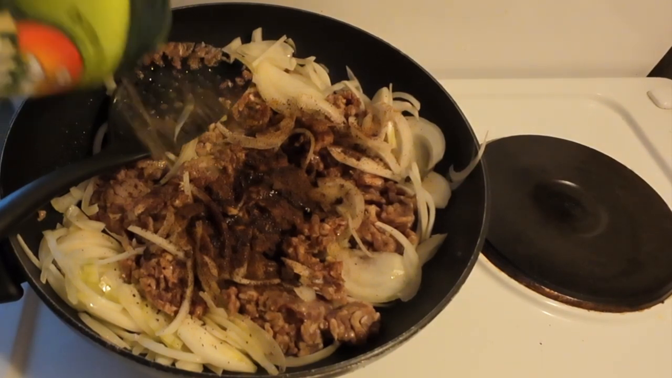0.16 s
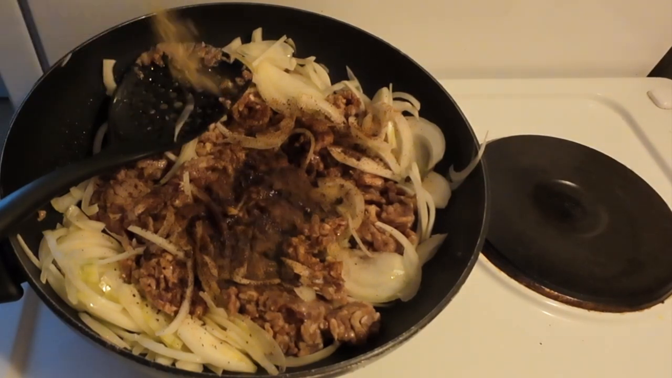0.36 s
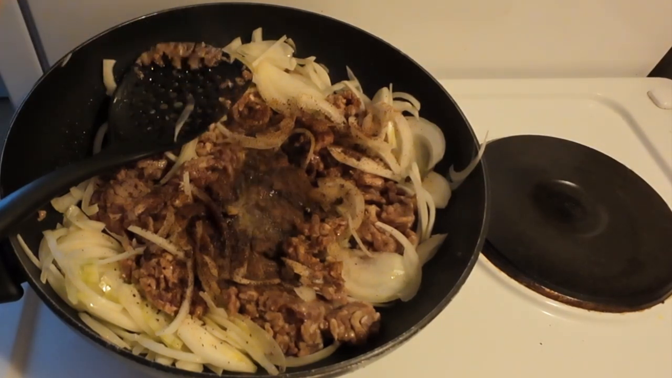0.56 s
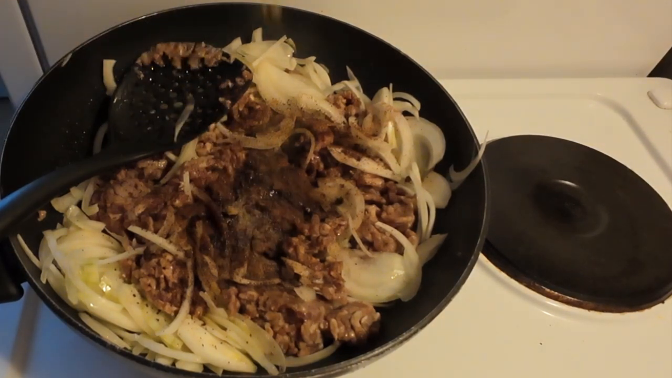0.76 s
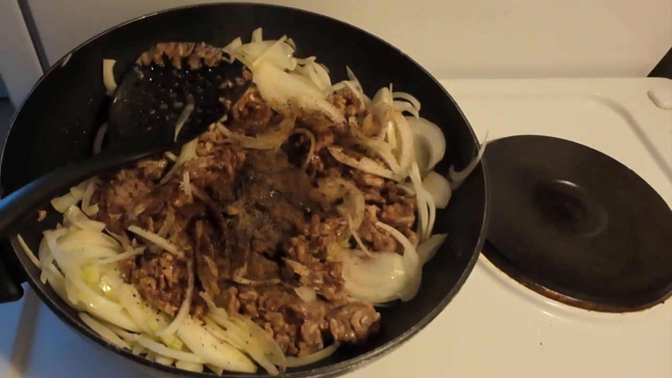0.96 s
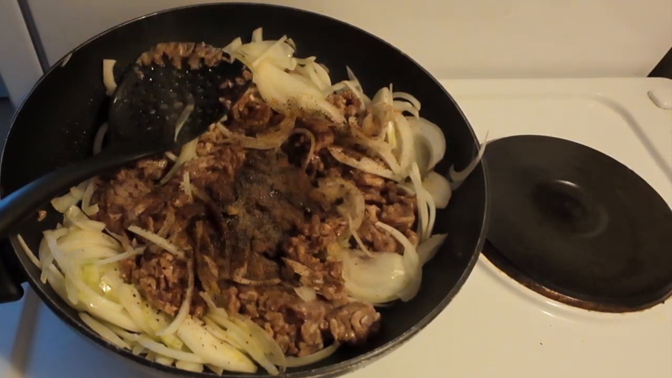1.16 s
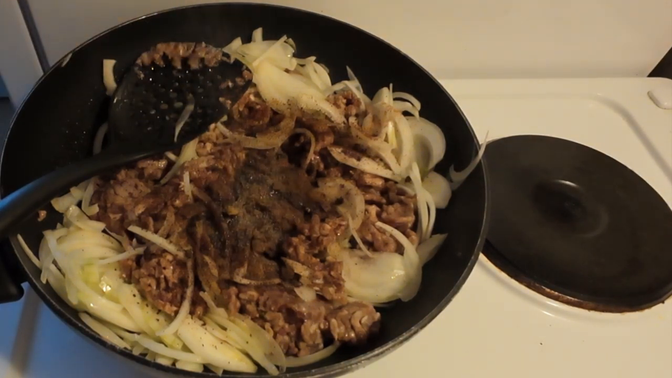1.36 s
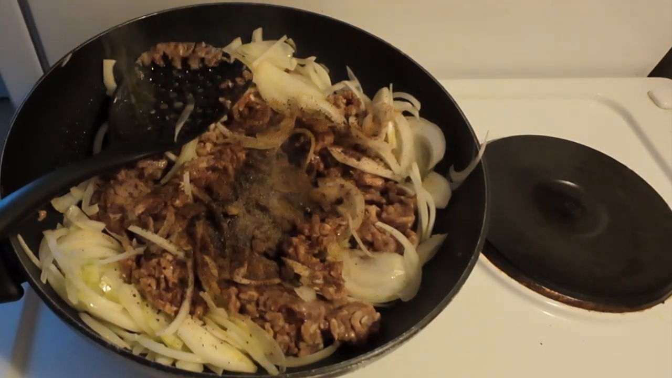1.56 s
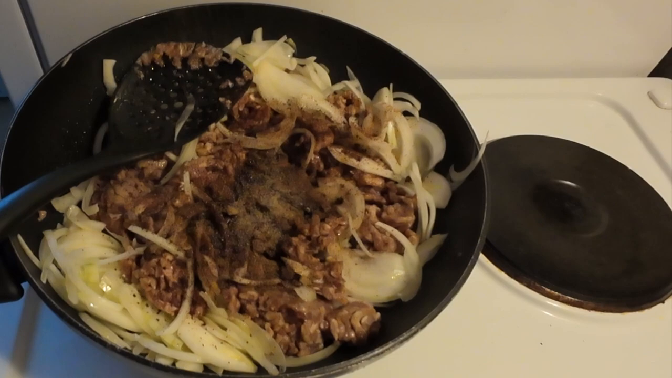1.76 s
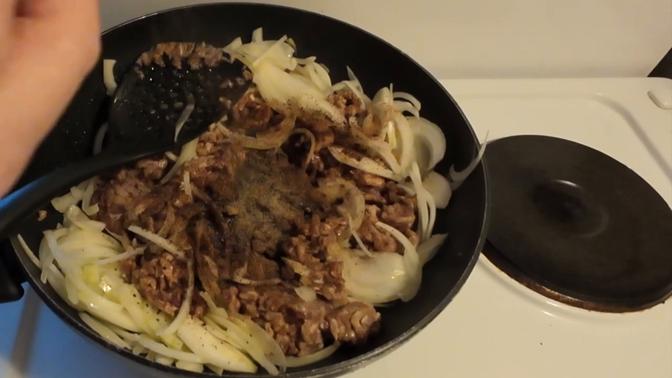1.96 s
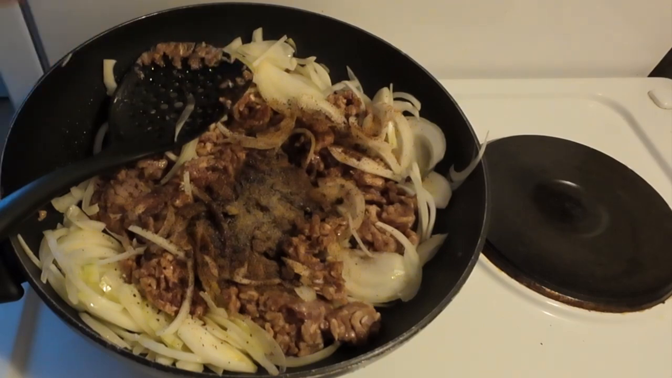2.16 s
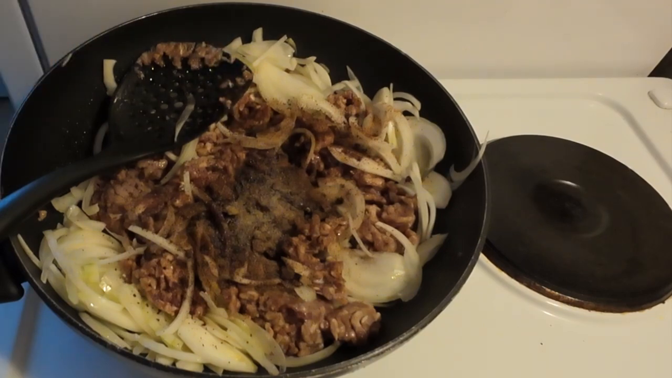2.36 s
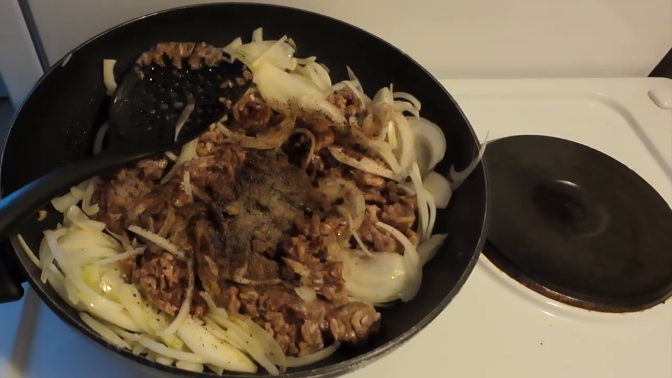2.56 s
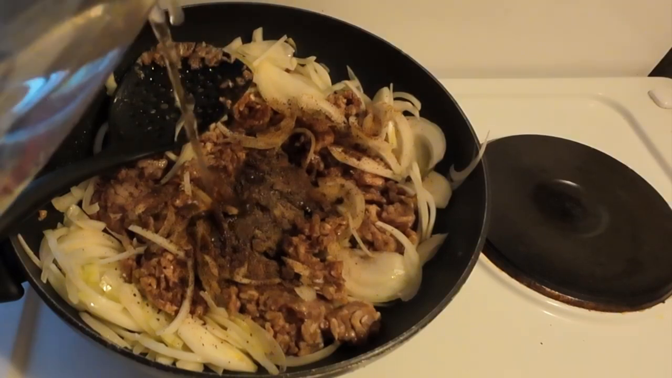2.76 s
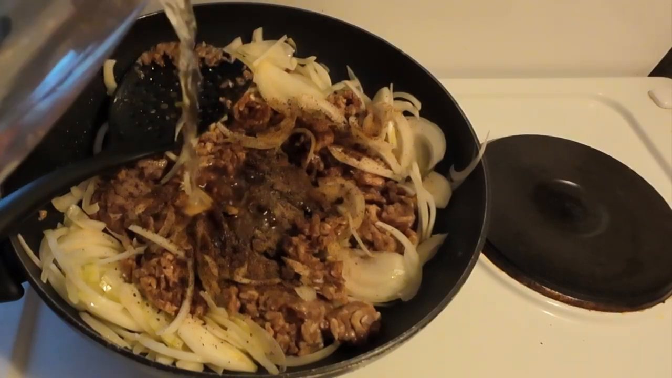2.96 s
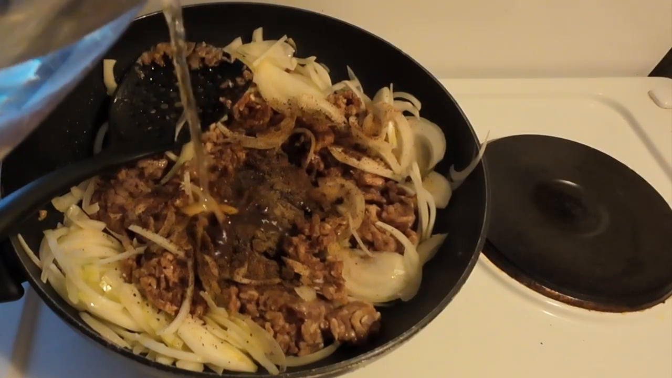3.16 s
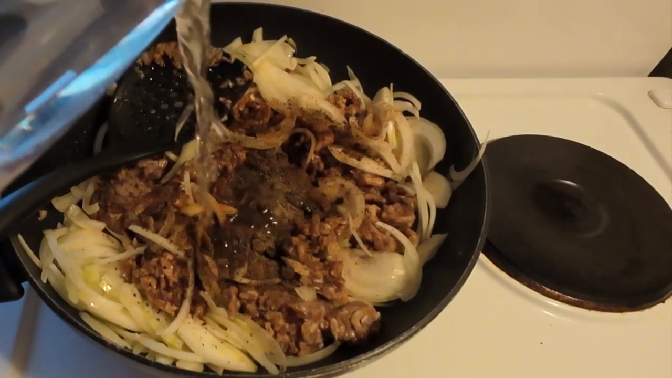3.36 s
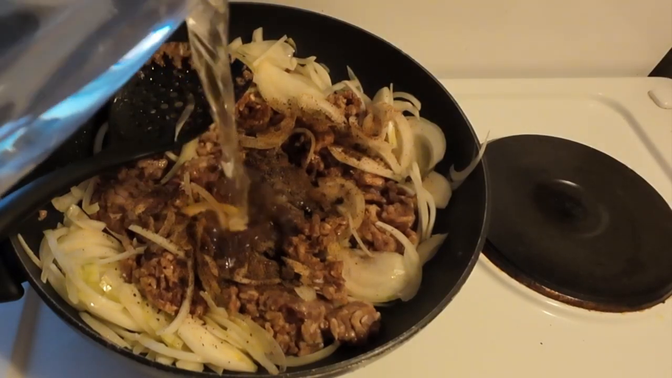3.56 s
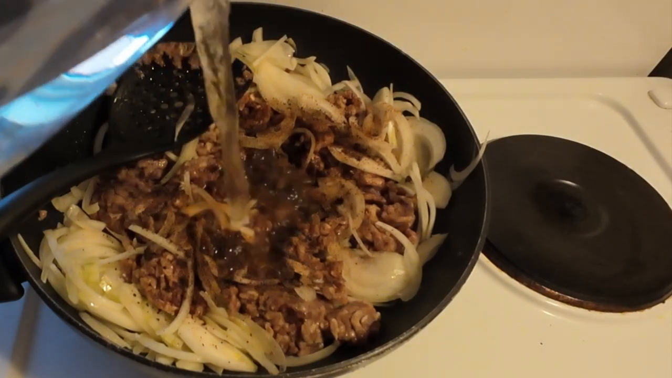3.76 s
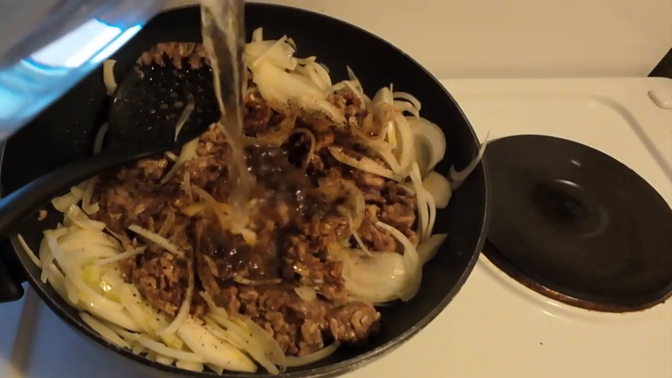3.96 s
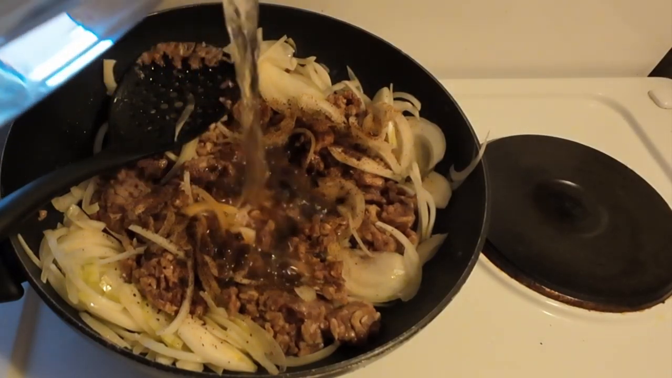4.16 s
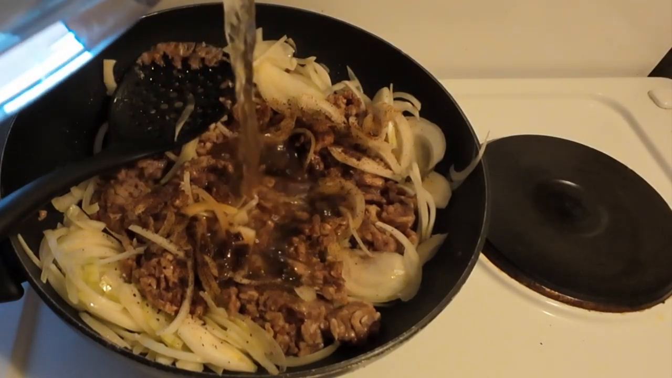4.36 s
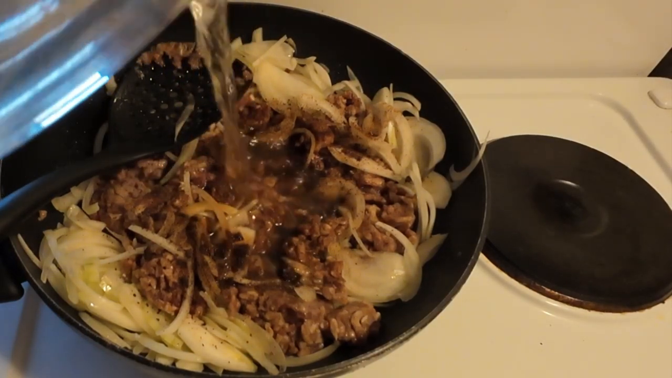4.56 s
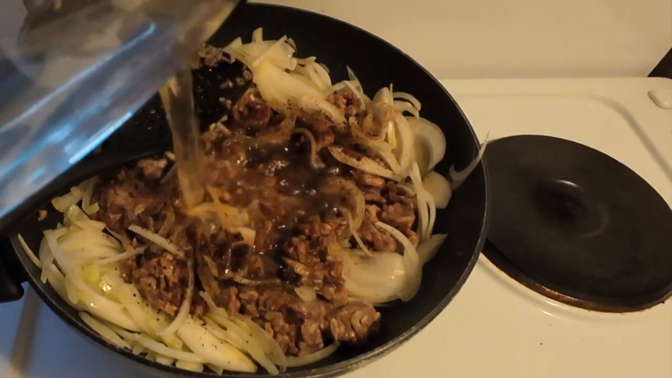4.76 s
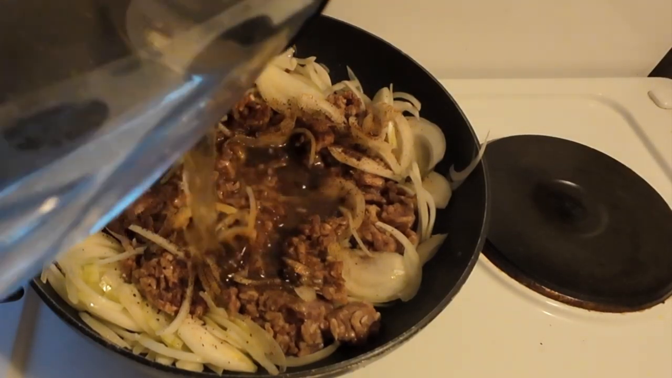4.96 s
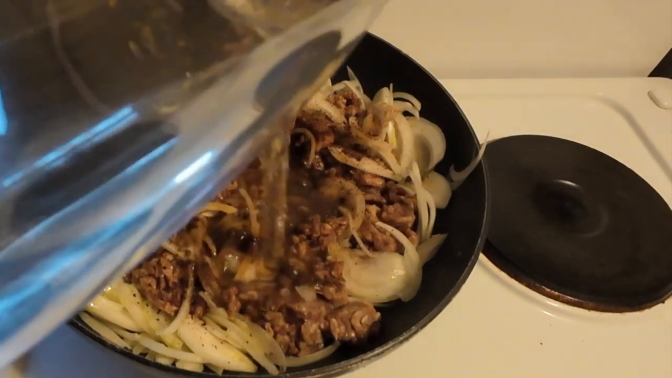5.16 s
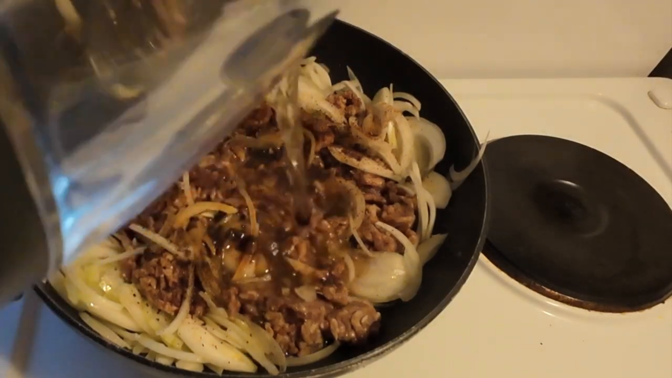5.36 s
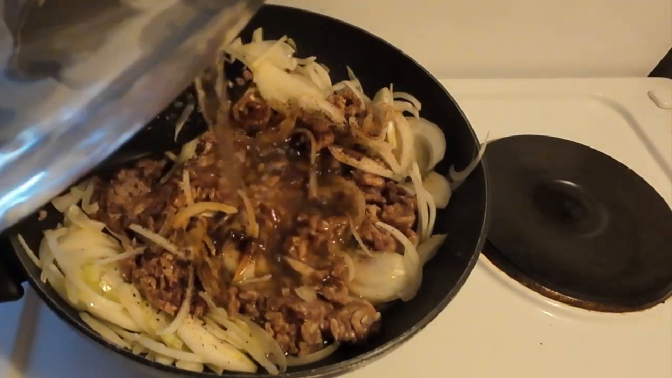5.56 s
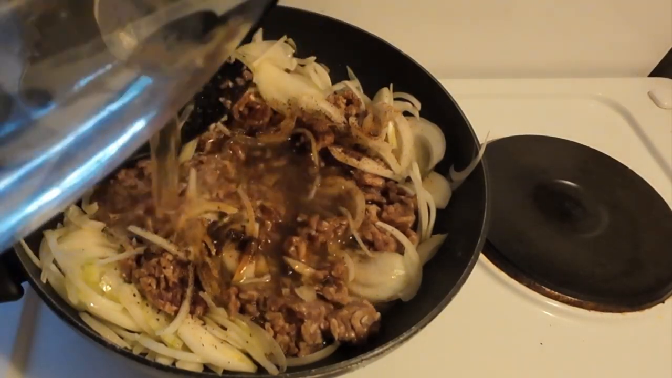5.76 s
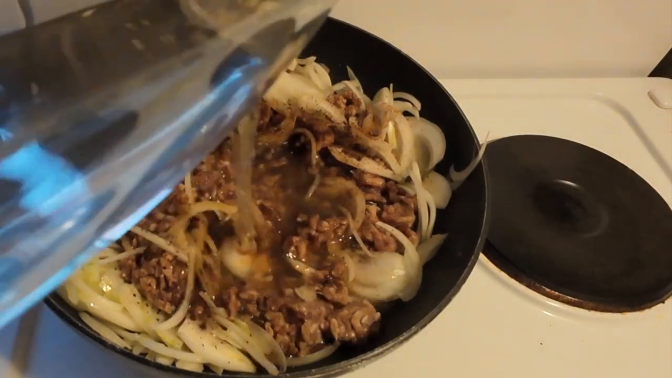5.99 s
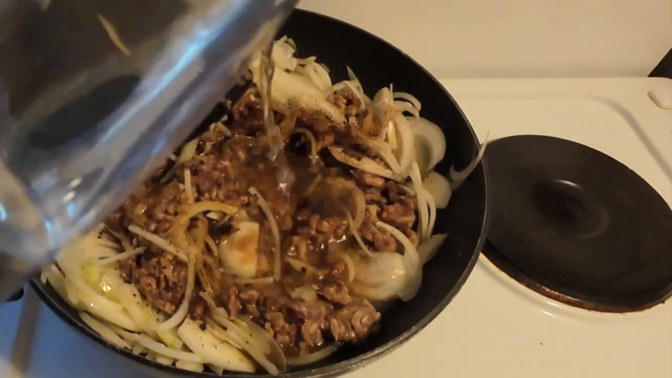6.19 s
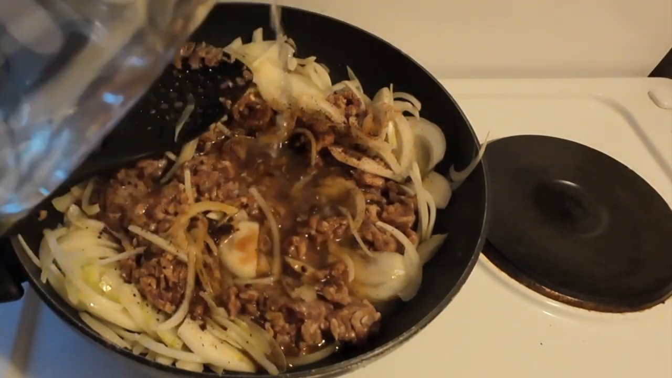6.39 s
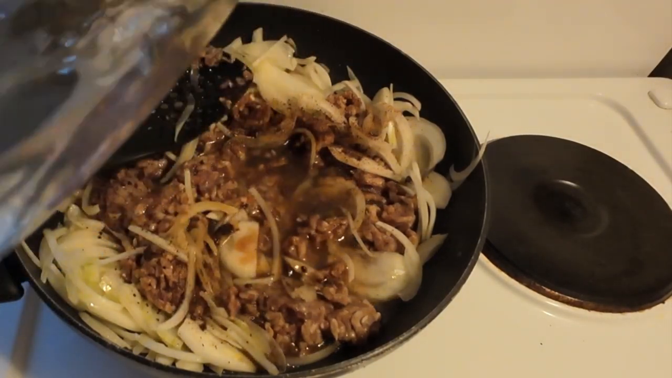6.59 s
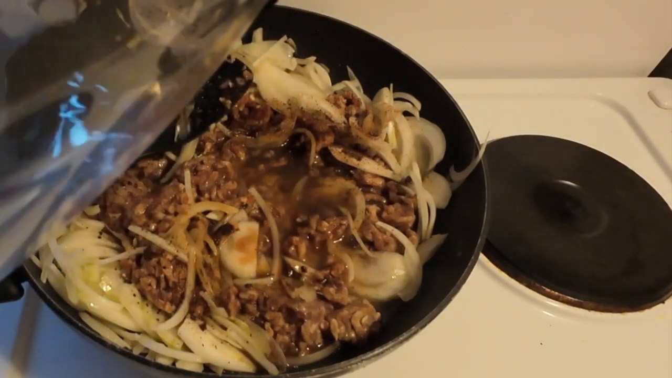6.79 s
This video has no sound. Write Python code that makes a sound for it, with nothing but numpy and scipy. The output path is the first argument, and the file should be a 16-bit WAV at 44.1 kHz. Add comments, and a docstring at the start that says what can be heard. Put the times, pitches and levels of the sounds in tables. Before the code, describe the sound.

A gentle steady pan sizzle and a few crackles give way to a lively splashing pour of water that breaks into drops and fades.

```python
"""Water poured into a sizzling pan

Minced meat and onions sizzle softly: a hiss of many random bursts, with short crackles where fat spits.
Water is poured from a jug: drops ring as short bright plips over a fizz of tiny clicks, until all fades.
Behind it lie dull rubbing and a thin whistling hiss, both made of noise ringing in resonances.
A close pair of microphone ports adds low filtered noise as rumble, the left one shaken by the pouring."""
import sys
import numpy as np
from scipy import signal
from scipy.fft import rfft, irfft, next_fast_len
from scipy.io import wavfile

SR = 44100
rng = np.random.default_rng(int(sys.argv[2]) if len(sys.argv) > 2 else 0)


def dump_mix(stems):
    """Bounce the given channels to the path in sys.argv[1] as a 16-bit WAV at rate SR."""
    frames = np.atleast_2d(stems).T  # one column per channel
    limited = np.clip(frames, -1, 1)  # hard clip at full scale
    pcm = np.round(limited * 32767).astype(np.int16)
    wavfile.write(sys.argv[1], SR, pcm)


N = 301203   # length in samples


def from_db(db):
    """Decibels to gain."""
    return 10 ** (np.asarray(db) / 20)


def rms_one(x):
    """Scale to an average strength (rms) of 1."""
    return x / np.sqrt(np.mean(x ** 2) + 1e-20)


def in_time(rows):
    """Turn (seconds, dB) rows into a curve in dB, sample by sample; -120 dB before the first row."""
    s, db = np.transpose(rows)
    return np.interp(np.arange(N) / SR, s, db, left=-120)


def at_hz(points, hz):
    """Read a (Hz, dB) table between its rows, on a log-frequency axis."""
    table_hz, db = np.transpose(points)
    return np.interp(np.log(hz), np.log(table_hz), db)


def colour(x, points):
    """Filter a sound by a (Hz, dB) table."""
    size = next_fast_len(N)
    hz = np.maximum(np.arange(size // 2 + 1) * SR / size, 1)
    return irfft(rfft(x, size) * from_db(at_hz(points, hz)), size)[:N]


def filtered(x, order, hz, kind):
    """Filter that keeps the low part, the high part or a band."""
    return signal.sosfilt(signal.butter(order, hz, kind, fs=SR, output="sos"), x)


def drift(rate):
    """Slow random wandering, about rate changes a second; spread 1."""
    r = np.exp(-80 * np.pi * rate / SR)   # computed at every 40th sample
    noise = rng.standard_normal(N // 40 + 2002)
    slow = signal.lfilter([1], [1, -2 * r, r * r], noise)[2000:]
    return np.interp(np.arange(N) / 40, np.arange(len(slow)), rms_one(slow))


def ring(clicks, hz, cycles):
    """A click sets a sine ringing that dies by 60 dB in so many cycles."""
    r, w = from_db(-60 * hz / (cycles * SR)), 2 * np.pi * hz / SR
    return signal.lfilter([0, np.sin(w)], [1, -2 * r * np.cos(w), r * r], clicks + 1e-18)


def grains(per_s, spread_db):
    """Random clicks: a positive spread makes a few much larger, a negative one a few much smaller."""
    sizes = from_db(spread_db * np.minimum(rng.exponential(1, N), 4.4))
    signs = rng.choice([-1, 1], N)
    return sizes * signs * (rng.random(N) < per_s / SR)


def swells(rows, rise, fall):
    """Bursts that rise over a share of their length, hold to its end, then die away."""
    t, shape = np.arange(N) / SR, np.zeros(N)
    for s, peak_db, length in rows:
        u = np.clip((t - s) / length, 0, 12)   # time in lengths of the burst
        dying = np.exp(-np.maximum(u - 1, 0) * fall)
        shape += from_db(peak_db) * np.minimum(u / rise, 1) * dying * (u < 12)
    return shape


def hollow(noise, modes):
    """Noise passes twice through each resonance, so the gaps between them stay dark."""
    out = 0
    for hz, wide, db in modes:
        cycles = 3.73 * hz / wide
        out = out + from_db(db) * rms_one(ring(ring(noise, hz, cycles), hz, cycles))
    return rms_one(out)


def wavering(noise, modes, swing_db, rate):
    """Resonances whose levels wander each on its own."""
    return rms_one(sum(from_db(mode[2] + swing_db * drift(rate)) * hollow(noise, [mode])
                       for mode in modes))


def scattered(x, t60):
    """Four short bursts of echoes, each dying by 60 dB in t60 seconds, in ever changing shares."""
    t = np.arange(round(np.clip(t60, .005, .25) * SR)) / SR
    tails = rng.standard_normal((4, SR // 4))[:, :len(t)] * from_db(-60 * t / t60)
    return sum(signal.fftconvolve(x * drift(60), tail / np.sqrt(4 * np.sum(tail ** 2)))[:N]
               for tail in tails)


# Tone of the shaking. Each row: frequency in Hz, relative level in dB.
SHAKE_TONE = [(25, -25), (45, -12.5), (65, 10), (82, 6.5), (100, -4), (140, -77.5)]
# Tone of the steadier rumble. Each row: frequency in Hz, relative level in dB.
DRONE_TONE = [(20, 3), (40, -7.5), (80, -22.5), (100, 4), (122, -5.5), (150, -19), (250, -40)]
# Low bumps while the jug is handled. Each row: start in seconds, length in seconds,
# shaking of the left port in dB, rumble at both ports in dB.
BUMPS = [(2.71, 0.062, -42, -66), (2.864, 0.074, -69, -46.5), (3.005, 0.21, -41, -93),
         (3.313, 0.11, -34.5, -85), (3.512, 0.7, -35.5, -92), (4.539, 0.055, -31, -71),
         (4.77, 0.08, -79, -51.5), (5.18, 0.096, -37, -54), (5.325, 0.12, -38.5, -51),
         (5.954, 0.21, -33.5, -61), (6.36, 0.095, -39, -65)]
SHAKE_DB, DRONE_DB = -57, -53.5   # level between the bumps; the drone wanders around its own


def rumble():
    """Lumpy low noise: strong in the left port, opposed in the right, and a drone shared partly."""
    shake, other = (rms_one(colour(n, SHAKE_TONE)) for n in rng.standard_normal((2, N)))
    both, left, right = (rms_one(colour(n, DRONE_TONE)) for n in rng.standard_normal((3, N)))
    shaken, droning = (swells(np.array(BUMPS)[:, [0, k, 1]], rise=0.53, fall=1.85) for k in (2, 3))
    rocking = (from_db(SHAKE_DB) + shaken) * np.array([shake, -.15 * shake + 0.11 * other])
    drone_level = from_db(DRONE_DB + 2 * drift(13.3)) + droning
    return rocking + drone_level * (both + 0.53 * np.array([left, right]))


# Resonances of the whistling. Each row: frequency in Hz, width in Hz, relative level in dB.
WHISTLE_MODES = [(1782, 170, 5), (3680, 260, -4)]
# Where it swells. Each row: start in seconds, peak level in dB, length in seconds.
WHISTLE_SWELL = [(2.08, -48.5, 0.25)]
WHISTLE_DB = -75   # faint outside the swell


def whistling():
    """A thin whistling hiss: noise ringing in narrow resonances."""
    level = from_db(WHISTLE_DB) + swells(WHISTLE_SWELL, rise=0.63, fall=2.5)
    return level * hollow(rng.standard_normal(N), WHISTLE_MODES)


# Hollow tone of the rubbing. Each row: frequency in Hz, width in Hz, relative level in dB.
RUB_MODES = [(342.4, 73, -2.5), (395.7, 33, -3.5), (442.4, 77, 0)]
# Dull rubbing somewhere near the pan. Each row: start in seconds, peak level in dB, length in seconds.
RUBS = [(0.06, -61.5, 0.077), (1.02, -64, 0.4), (1.48, -59.5, 0.16), (2.0, -59, 0.14), (2.2, -67.5, 0.26),
        (2.7, -59.5, 0.34), (3.95, -66, 0.46), (5.65, -64.5, 0.4), (6.275, -56, 0.068)]


def rubbing(heat_db):
    """Dull noise in a few low, wavering resonances, over a faint part that follows the sizzle."""
    faint = from_db(-77.0 + 0.23 * (heat_db - heat_db[0]))
    level = faint + swells(RUBS, rise=0.4, fall=3.4)
    return level * wavering(rng.standard_normal(N), RUB_MODES, swing_db=2.5, rate=9)


# Tone of the sizzle. Each row: frequency in Hz, relative level in dB.
SIZZLE_TONE = [(150, -19.5), (250, -13), (560, -28), (1250, -13.5), (1450, -1.5), (3100, -1.5), (4860, -8),
               (5900, -8), (7200, -16.5), (11500, -23), (13400, -15), (14800, -23.5), (15600, -30)]
# Resonances of pan and hob under the sizzle. Each row: frequency in Hz, width in Hz, relative level in dB.
PAN_MODES = [(1510, 220, 5), (1770, 300, 8), (2290, 350, 6), (3100, 600, 5), (5900, 470, -3)]
# Low resonances of the pan. Each row: frequency in Hz, width in Hz, relative level in dB.
BODY_MODES = [(702, 70, -0.5), (838.5, 110, 8), (942, 120, 10), (1089, 160, 9), (1240, 240, 10.5)]
# Level of these low resonances, before wavering. Each row: time in seconds, level in dB.
BODY_LEVEL = [(0, -65), (4.58, -58.5), (4.68, -76), (5.35, -73), (5.6, -69), (6.45, -80)]
# Heat of the pan, heard as sizzle; the water quenches it. Each row: time in seconds, level in dB.
HEAT = [(0.0, -51), (4.55, -50), (5.21, -58), (5.7, -52.5), (6.4, -69), (6.83, -81)]


def sizzle(heat_db):
    """Thousands of steam bubbles burst each second, nearly a smooth hiss; the pan sings along in bands."""
    bursts = rms_one(grains(9000, spread_db=1.0)) + 0.52 * rng.standard_normal(N)
    # the pan hears the bursts shifted by half the scene, so the two do not move together
    singing = wavering(np.roll(bursts, N // 2), PAN_MODES, swing_db=1.5, rate=9)
    hiss = rms_one(colour(bursts, SIZZLE_TONE)) + from_db(-3.5) * singing
    body_level = from_db(in_time(BODY_LEVEL) + drift(6))
    body = body_level * wavering(rng.standard_normal(N), BODY_MODES, swing_db=2, rate=6.3)
    return from_db(heat_db + 0.41 * drift(41)) * hiss + body


# Fat spitting in soft crackles. Each row: start in seconds, treble peak in dB, middle peak in dB,
# length in seconds.
SPITS = [(0.063, -42.5, -46.5, 0.026), (0.301, -51, -60, 0.018), (0.491, -37.5, -40, 0.016),
         (0.666, -49.5, -62, 0.015), (1.247, -53, -77, 0.066), (1.74, -51.5, -68, 0.017),
         (2.016, -50.5, -62, 0.03)]
# Tone of the crackle. Each row: frequency in Hz, relative level in dB.
SPIT_TONE = [(880, -24), (1500, 7), (3120, 12), (4420, 13.5), (12400, 8.5)]
SPIT_SPLIT_HZ = 6000   # treble above, middle below


def spits():
    """Uneven bursts of crackling clicks; each has its own share of treble and middle."""
    crackle = rms_one(colour(grains(5000 * from_db(1.6 * drift(75)), spread_db=4.0), SPIT_TONE))
    out = 0
    for column, kind in ((1, "high"), (2, "low")):
        level = swells(np.array(SPITS)[:, [0, column, 3]], rise=0.61, fall=0.76)
        out = out + level * rms_one(filtered(crackle, 2, SPIT_SPLIT_HZ, kind))
    return out


# The stream hitting pooled water. Each row: start in seconds, peak level in dB, length in seconds.
GULPS = [(2.72, -38.5, 0.028), (4.525, -43, 0.016), (4.85, -53, 0.025), (6.29, -55, 0.031),
         (6.425, -49.5, 0.011)]
# Tone of the slaps. Each row: frequency in Hz, relative level in dB.
GULP_TONE = [(150, -3), (350, 14), (600, 9.5), (900, 4), (1300, 14), (1800, 12), (4000, 3.5)]
GULP_RING_DB = -5   # the pan's low resonances, relative to the slaps


def gulps():
    """Uneven runs of wet slaps that set the low resonances of the pan ringing."""
    slaps = grains(1200, spread_db=4.0)
    sound = rms_one(colour(slaps, GULP_TONE)) + from_db(GULP_RING_DB) * hollow(slaps, BODY_MODES)
    return swells(GULPS, rise=0.063, fall=0.52) * sound


SPATTERS_PER_S, SPATTER_S, SPATTER_DB = 90, 0.0022, 9   # sudden bursts: rate, decay time, relative height


def spatter(clicks):
    """Each click starts at once and dies within a few milliseconds."""
    return signal.lfilter([1], [1, -np.exp(-1 / (SPATTER_S * SR))], np.abs(clicks) + 1e-18)


# Tone of the fizz. Each row: frequency in Hz, relative level in dB.
FIZZ_TONE = [(2940, -17), (5000, -1), (7230, 0), (9250, 2.5), (11600, -1), (13400, 9), (15100, -3),
             (16200, -37)]
# Bands of the spray that burst partly on their own. Each row: lower edge in Hz, upper edge in Hz.
SPRAY_BANDS = [(1500, 4000), (4000, 7000), (7000, 11500), (11500, 17000)]
DROP_SPRAY_DB = -26   # spray thrown up by a clear drop, relative to the drop's strength


def spray(level):
    """Tiny bubbles fizz in clumps; spatters and clear drops make bands of them flare up."""
    fizz = rms_one(colour(grains(3000 * from_db(1.6 * drift(30)), spread_db=-3.5), FIZZ_TONE))
    s, strength_db, _ = np.transpose(PLIPS)
    thrown = np.zeros(N)
    thrown[(s * SR).astype(int)] = from_db(strength_db + DROP_SPRAY_DB)
    shared, out = grains(SPATTERS_PER_S, spread_db=1.0), 0
    for edges in SPRAY_BANDS:
        own = grains(SPATTERS_PER_S * 0.45, spread_db=1.5)
        flares = from_db(SPATTER_DB) * spatter(shared * (rng.random(N) < .4) + own)
        out = out + filtered(fizz, 2, edges, "band") * (level * (1 + flares) + spatter(thrown))
    return out


# Flow of the stream, heard as fizz. Each row: time in seconds, level in dB.
FLOW = [(2.7, -87), (2.73, -48), (2.85, -52), (3.15, -46), (3.5, -45.5), (3.85, -47.5), (4.1, -47.5),
        (4.56, -44.5), (5.15, -49), (5.6, -45), (5.9, -49), (6.16, -44), (6.21, -49), (6.3, -55),
        (6.47, -48.5), (6.6, -75), (6.83, -82)]
# Strength of random drops by pitch, to which a rise in proportion to pitch is added.
# Each row: frequency in Hz, level in dB.
DROP_PITCHES = [(500, -43), (1050, -15), (2100, -1), (3440, 14), (5500, 7), (9220, -0.5), (13300, 4),
                (16000, -2)]
# Tone of the tick of contact. Each row: frequency in Hz, relative level in dB.
TICK_TONE = [(900, -43.5), (2000, 11), (6000, 10), (12000, -19)]
# Splashes when the stream breaks up. Each row: start in seconds, drops peak in dB, spray peak in dB,
# length in seconds.
SPLASHES = [(3.88, -48, -46.5, 0.2), (4.255, -46.5, -45, 0.061), (4.812, -46, -58, 0.045),
            (5.223, -51.5, -45.5, 0.069), (5.67, -47.5, -66, 0.059), (6.229, -42.5, -77, 0.033),
            (6.282, -77, -42.5, 0.096)]
# at this flow the random drops have this level; they move by so many dB per dB of flow
DROPS_AT_DB, DROPS_DB, DROPS_FOLLOW = -46, -52, 3.23


def stream(flow_db):
    """Drops come in clumps, each ringing a few cycles at the pitch of its bubble; spray fizzes above."""
    clicks = grains(550 * from_db(6 * drift(30)), spread_db=2.5)
    pitches, dealt = np.geomspace(900, 14000, 56), rng.integers(0, 56, N)   # each click gets one pitch
    rings = sum(from_db(at_hz(DROP_PITCHES, hz)) * hz * ring(clicks * (dealt == k), hz, cycles=22)
                for k, hz in enumerate(pitches))
    ticks = rms_one(colour(clicks, TICK_TONE))
    drops_splash, spray_splash = (swells(np.array(SPLASHES)[:, [0, k, 3]], rise=0.68, fall=2.8)
                                  for k in (1, 2))
    drops_level = from_db(DROPS_DB + DROPS_FOLLOW * (flow_db - DROPS_AT_DB)) + drops_splash
    return drops_level * (rms_one(rings) + ticks) + spray(from_db(flow_db) + spray_splash)


# Clear single drops. Each row: start in seconds, strength in dB, pitch of the bubble in Hz.
PLIPS = [(2.894, -16, 6660), (2.9483, -25, 13300), (3.0176, -22.5, 7060), (3.038, -29, 3730),
         (3.049, -23, 3660), (3.103, -12.5, 14400), (3.1331, -16, 12700), (3.145, -21, 7850),
         (3.162, -19, 3980), (3.179, -21, 3900), (3.26, -23, 5600), (3.302, -24, 4300),
         (3.333, -24.5, 2300), (3.349, -21.5, 5940), (3.365, -19.5, 3700), (3.394, -33, 6150),
         (3.409, -22.5, 1600), (3.4192, -18, 5300), (3.457, -18, 5000), (3.461, -20.5, 2980),
         (3.475, -23, 4020), (3.511, -25.5, 1500), (3.569, -16, 14000), (3.595, -16.5, 8650),
         (3.61, -23.5, 1700), (3.622, -18.5, 3460), (3.77, -21.5, 2730), (3.7578, -17, 13400),
         (3.9302, -12.5, 8900), (3.952, -17, 3250), (3.964, -13, 2680), (3.977, -21, 3020),
         (4.0015, -17.5, 4370), (4.0382, -21, 4970), (4.0658, -20.5, 5060), (4.107, -21, 13600),
         (4.1316, -16, 13600), (4.232, -19, 13000), (4.2855, -18.5, 3020), (4.3267, -11.5, 3620),
         (4.341, -14, 3930), (4.377, -25, 2110), (4.415, -17.5, 12700), (4.419, -23.5, 2290),
         (4.457, -19, 13400), (4.486, -9.5, 12900), (4.532, -15.5, 1110), (4.54, -20, 7800),
         (4.5533, -14, 13600), (4.579, -21.5, 1910), (4.594, -16.5, 5430), (4.661, -20.5, 3500),
         (4.752, -21.5, 2500), (4.808, -22, 13800), (4.858, -21.5, 1990), (4.882, -30, 3300),
         (5.021, -27.5, 2000), (5.071, -28.5, 8800), (5.171, -28, 3420), (5.212, -27, 8200),
         (5.2505, -19, 6860), (5.271, -15.5, 5740), (5.2914, -11.5, 6100), (5.384, -20, 7300),
         (5.398, -18.5, 4600), (5.41, -18.5, 3480), (5.441, -34, 1050), (5.408, -30, 1680),
         (5.505, -39, 1340), (5.537, -33, 1360), (5.551, -26.5, 1500), (5.591, -20, 4500),
         (5.547, -18.5, 8000), (5.5673, -16, 3520), (5.611, -28, 1570), (5.641, -23.5, 2630),
         (5.6782, -15.5, 4240), (5.683, -30, 1120), (5.706, -19.5, 1690), (5.7486, -19.5, 8200),
         (5.82, -21, 3600), (5.845, -38, 1500), (5.881, -37, 1420), (5.932, -22.5, 6530),
         (5.939, -27, 1990), (6.043, -18, 8080), (6.072, -30, 1570), (6.121, -12.5, 7980),
         (6.167, -19.5, 6500), (6.234, -8.5, 4420), (6.242, -14, 13500), (6.2583, -36.5, 1710),
         (6.3098, -25, 4500), (6.3328, -14, 7900), (6.3553, -10.5, 6400), (6.387, -15.5, 5300),
         (6.4241, -34, 980), (6.452, -31, 5200), (6.472, -37, 1340), (6.51, -36, 6200),
         (6.5356, -30.5, 7400), (6.584, -44, 3000), (6.6463, -27, 9140), (6.687, -33, 14200),
         (6.701, -35.5, 3700), (6.75, -42.5, 4700)]
# How large and small bubbles differ. Each row: pitch in Hz, cycles to die by 60 dB,
# upward bend of the pitch (a factor per cycle), share of the crack.
BUBBLE_SIZES = [(1500, 14, 0.012, .45), (2600, 17, 0.002, 0.6), (12000, 40, 0, .6)]
TWIN_DB = -10.5   # two quieter bubbles beside each clear drop


def plips():
    """A drop cracks on contact; three bubbles swell in 1.54 cycles and ring, the lower ones rising."""
    out, t = np.zeros(N + 1200), np.arange(1200) / SR
    crack = np.diff(np.exp(-(t * 26000 - 2.5) ** 2), n=2, prepend=[0, 0])
    size_hz, *laws = np.transpose(BUBBLE_SIZES)
    all_ratios = rng.uniform([1.12, 1.45], [1.4, 1.9], (len(PLIPS), 2))
    for (s, strength_db, hz), ratios in zip(PLIPS, all_ratios):
        cycles_long, glide, crack_share = (np.interp(hz, size_hz, law) for law in laws)
        twins_hz = hz * ratios if hz < 8000 else hz / ratios
        cycles = np.outer([hz, *twins_hz], t)
        tones = np.sin(2 * np.pi * cycles * (1 + glide * cycles))
        bubbles = tones * from_db(-60 * cycles / cycles_long) * np.minimum(cycles / 1.54, 1)
        bubble = bubbles[0] + from_db(TWIN_DB) * (bubbles[1] + bubbles[2])
        start = round(s * SR)
        out[start:start + len(t)] += from_db(strength_db) * (bubble + crack_share * crack)
    return out[:N]


PAN_T60_S, PAN_DULL_HZ = .048, 7300   # time to die by 60 dB; the treble above this is softened


def water_in_pan():
    """Stream and clear drops, with echoes between pan walls, hob and tiles."""
    water = stream(in_time(FLOW)) + plips()
    echoes = signal.lfilter(*signal.butter(1, PAN_DULL_HZ, fs=SR), scattered(water, PAN_T60_S))
    return filtered(water + echoes, 4, 650, "high")   # small drops carry no bass


# What differs between the ports. Each row: frequency in Hz, side minus middle in dB.
APART = [(200, -7), (380, -14), (850, -18), (1300, -31), (2800, -30), (4600, -14.5), (8120, -7),
         (15000, -3.5)]
# Balance of the ports. Each row: frequency in Hz, left minus right in dB.
LEAN = [(1500, 0.1), (4400, 1.2), (8000, .3), (15000, -4.5)]


def ports(mid):
    """The two ports share the sound but hear different reflections, least alike in bass and treble."""
    side = colour(scattered(mid, t60=0.0035), APART)
    left, right = np.array(LEAN) * [1, .5], np.array(LEAN) * [1, -.5]   # half the lean each
    return np.array([colour(mid + side, left), colour(mid - side, right)])


def scene():
    """Pan, water and rumble at the two ports."""
    heat_db = in_time(HEAT)
    background = whistling() + rubbing(heat_db)
    fat = sizzle(heat_db) + spits()
    return ports(background + fat + gulps() + water_in_pan()) + rumble()


def record(dry):
    """The top is cut steeply: at least 70 dB down from 16400 Hz upward."""
    return signal.sosfilt(signal.cheby2(12, 70, 16400, fs=SR, output="sos"), dry)


dry = scene()
out = record(dry)
dump_mix(out)
```